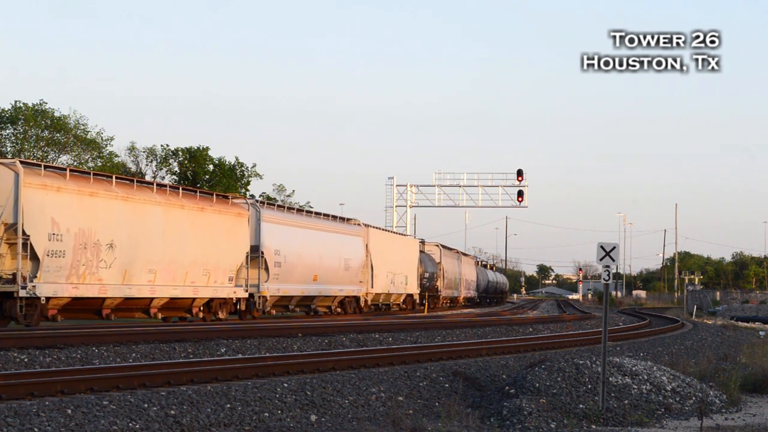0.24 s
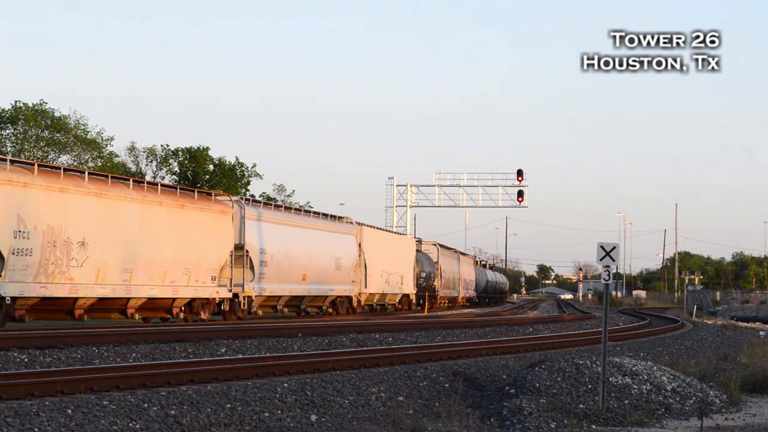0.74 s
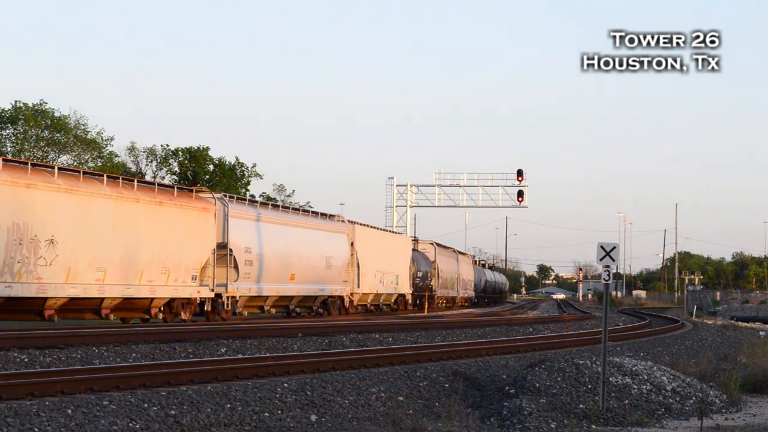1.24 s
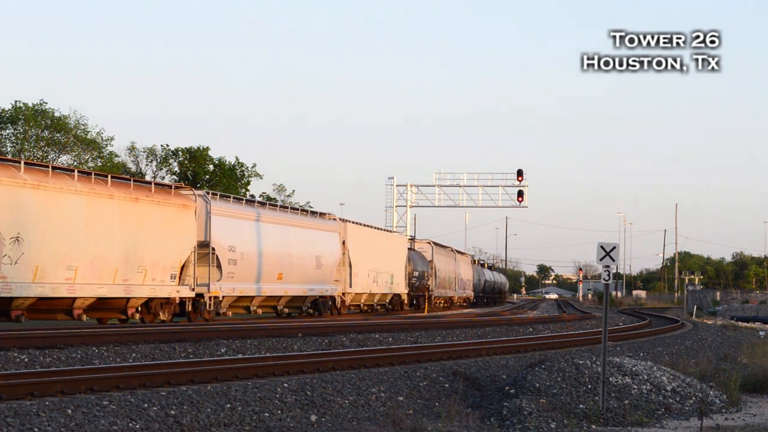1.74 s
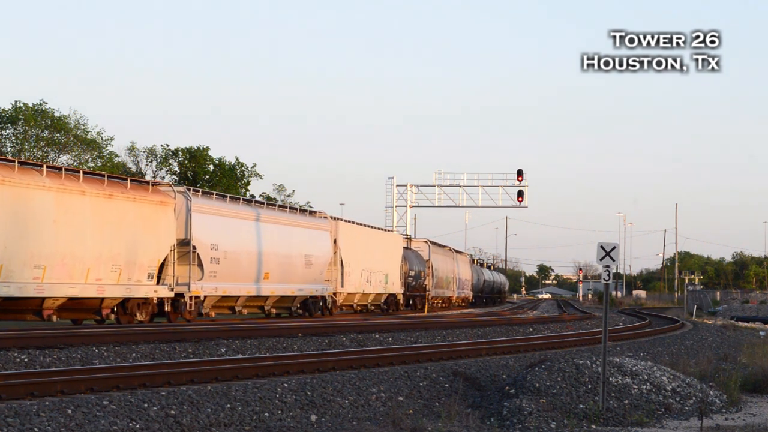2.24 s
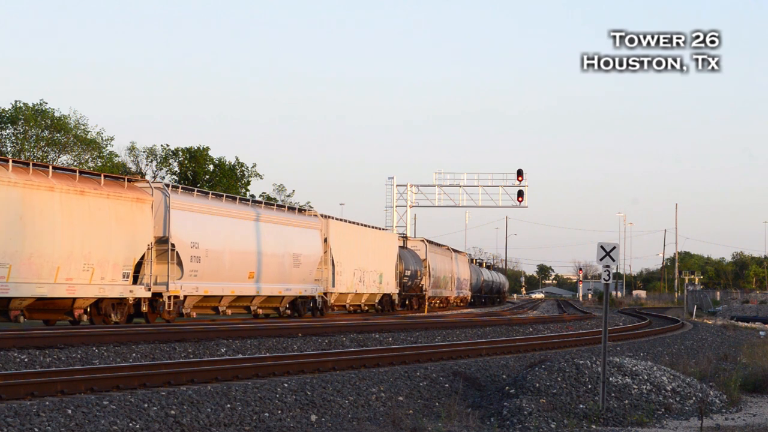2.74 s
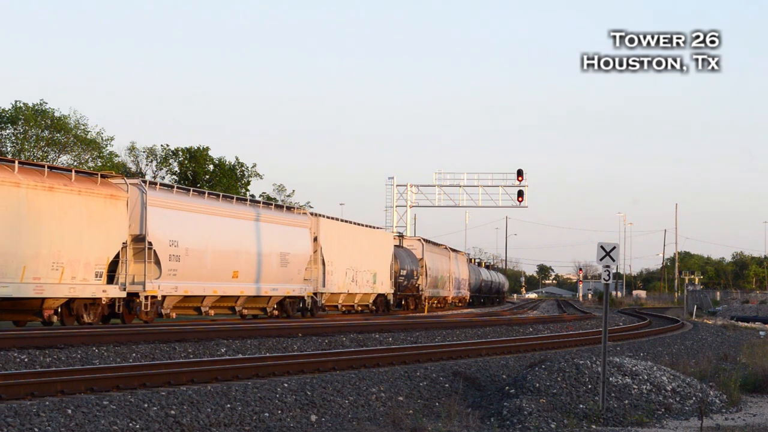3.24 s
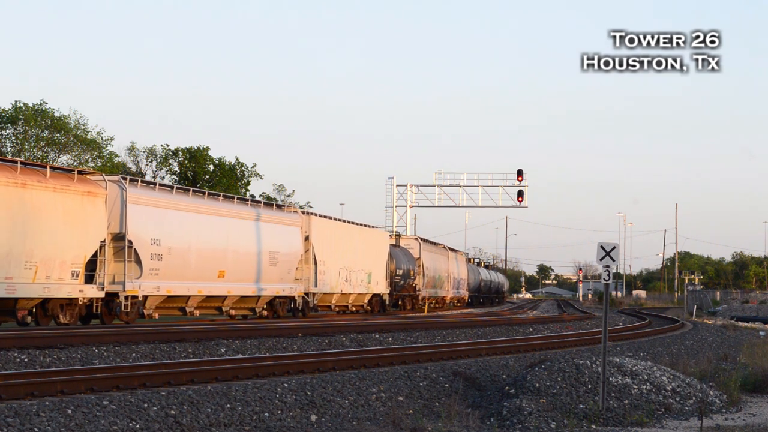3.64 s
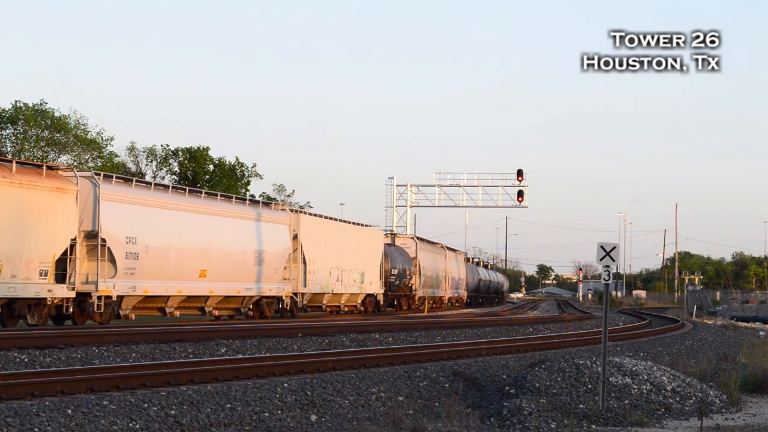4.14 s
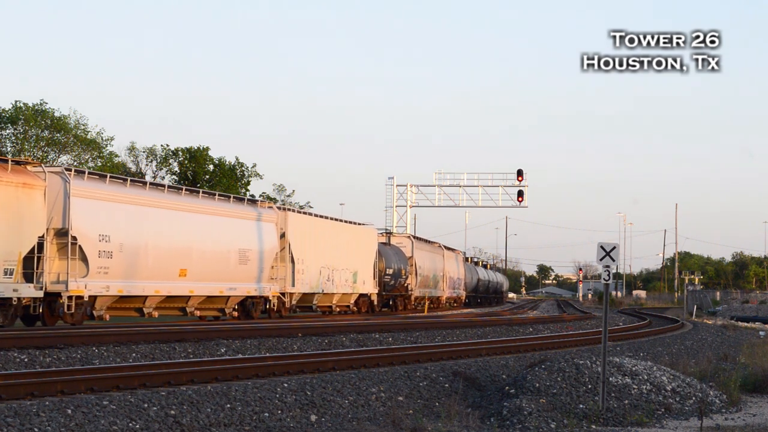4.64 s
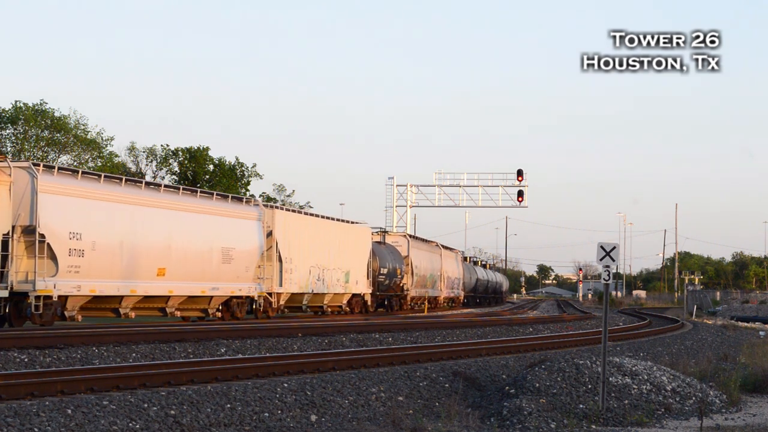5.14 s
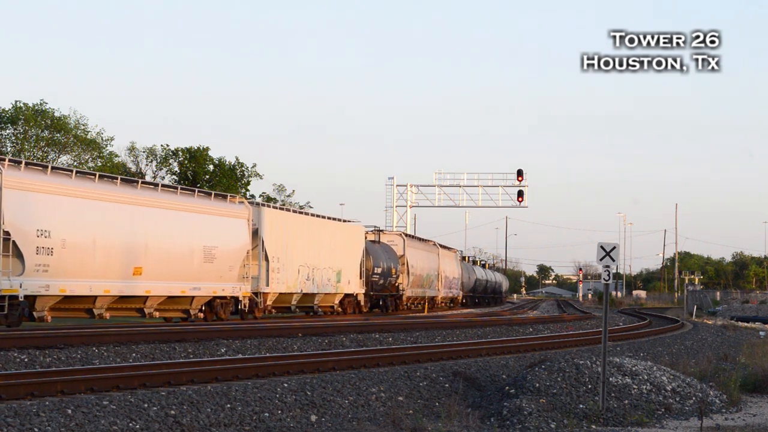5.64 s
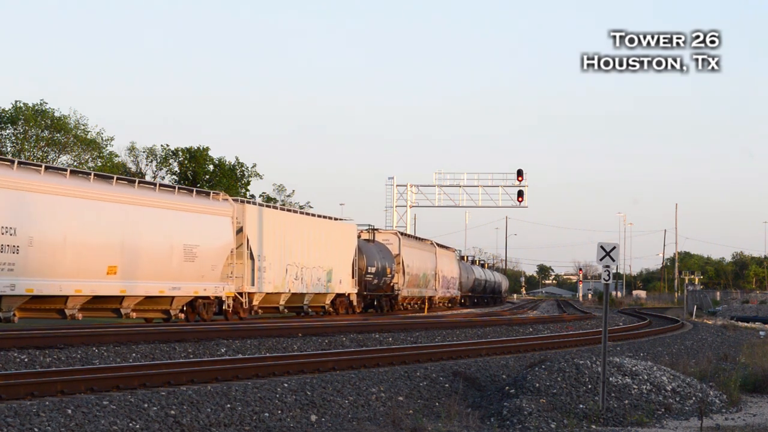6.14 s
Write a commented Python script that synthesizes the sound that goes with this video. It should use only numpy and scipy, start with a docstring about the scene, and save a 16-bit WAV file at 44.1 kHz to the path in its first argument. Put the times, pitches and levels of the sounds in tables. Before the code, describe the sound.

A high, wavering train wheel squeal turns into a hissing metallic screech as freight cars rumble slowly past on curved track.

```python
"""Freight cars on a tight curve

The cars roll slowly past one mono microphone. Flanges grind on the rail in bouts; the friction hisses
and rings the steel wheels in their modes. Single modes lock into squeals for a while, one wheel sings
two notes throughout and the rims whistle thinly. Below, the cars rumble and their bodies groan."""
import sys
import numpy as np
from scipy import signal
from scipy.fft import rfft, irfft
from scipy.io import wavfile
from scipy.ndimage import uniform_filter1d

SR = 44100
rng = np.random.default_rng(int(sys.argv[2]) if len(sys.argv) > 2 else 0)


def generate_wav(sig):
    """Save sig (samples, or channels by samples) to the path in sys.argv[1] as 16-bit PCM at SR."""
    pcm = np.round(np.clip(np.atleast_2d(sig).T, -1, 1) * 32767).astype(np.int16)
    wavfile.write(sys.argv[1], SR, pcm)


N = 281799
FREQ_HZ = np.arange(N // 2 + 1) * SR / N
TIME_S = np.arange(N) / SR

# rolling noise spectrum: f/Hz, relative density/dB
RUMBLE_SPECTRUM = [(15, -47), (28, -22), (55, -6), (90, 0), (125, -9.5), (200, -11), (270, -20.5),
                   (934, -20.5), (1460, -26), (2400, -23.5), (4080, -42), (7540, -34), (11000, -40),
                   (15600, -47)]
# rolling noise above the bass: t/s, level/dB
RUMBLE_UPPER_LEVEL = [(0, -45), (1.5, -43), (5.4, -42.5), (5.8, -41.5), (6.39, -42.5)]
# singing wheel: t/s, high note level/dB, low note level/dB
SINGING_LEVELS = [(0.0, -27, -40), (0.23, -27, -37.5), (0.27, -33, -44), (0.39, -23.5, -38),
                  (0.5, -29, -46), (0.53, -23, -41.5), (0.75, -28.5, -37), (1.01, -26, -53),
                  (1.07, -23.5, -40), (1.42, -30, -39), (1.51, -20, -49), (1.56, -34, -48),
                  (1.96, -23.5, -42), (2.08, -26, -43), (2.37, -22.5, -55), (2.72, -34, -46),
                  (3.75, -41, -53), (4.0, -31.5, -47), (4.16, -39, -50.5), (5.92, -37, -48),
                  (6.34, -33, -55), (6.39, -38, -52)]
# its grip: t/s, pitch/rest pitch, locked tone weight/dB
SINGING_GRIP = [(0, 1.0015, 0), (1.2, 1, 0), (2.5, .9982, 3), (2.75, 1.002, -9), (6.39, 1.0005, -8)]
# modes of a released wheel: f/Hz, level/dB, t60/s
RELEASED_MODES = [(960, -60, 3), (3547, -52, 2), (5476, -52, .9), (6454, -42, .7), (7425, -42, 1.2),
                  (8420, -50, .8), (8660, -58, .6), (9070, -62, 5), (10330, -64, 1.2)]
# rim friction: t/s, level/dB
RIM_FRICTION = [(0, -72), (.26, -82), (.49, -76), (.68, -58), (1.14, -61), (1.39, -47), (1.92, -45),
                (2.7, -43.5), (3.17, -48.5), (3.46, -40), (3.69, -60), (3.9, -44), (4.32, -52.5),
                (5.33, -59.5), (6.39, -50)]
# modes of rims, near wheels, far wheels: f/Hz, nominal width/Hz, relative density/dB
RIM_MODES = [(10954, 45, 4), (11127, 80, 8), (11380, 77, 10), (11620, 82, 7), (11857, 18, -6),
             (12020, 49, 7), (12154, 52, 2), (12302, 50, 4), (12433, 55, 0), (12776, 104, 0),
             (13290, 22, 0), (13367, 128, -7), (13723, 30, -9), (13851, 76, -3), (14135, 66, -14),
             (14434, 98, -7), (15145, 79, -10)]
NEAR_MODES = [(1644, 65, -4), (1785, 29, 1), (1954, 107, 3), (2252, 46, 3), (2645, 37, 8), (2839, 149, 8),
              (3355, 74, 2), (3584, 58, 6), (3946, 128, 7), (4944, 149, 2), (5154, 57, 4), (5265, 33, 9),
              (5528, 87, 11), (5870, 149, 3), (6036, 58, 7), (6440, 38, 14), (6518, 50, 13), (6702, 34, 5),
              (6864, 82, 5), (7125, 33, -4), (7474, 92, 9), (7754, 118, 2), (8360, 44, 3), (8481, 56, 8),
              (8714, 31, 1), (9466, 87, 1), (9709, 38, -4), (10457, 100, -6), (10551, 18, -10),
              (10751, 36, -13)]
FAR_MODES = [(1611, 106, -6), (1775, 35, 1), (1955, 149, 1), (2229, 38, 3), (2641, 30, 8), (2755, 149, 6),
             (3319, 149, -1), (3578, 38, 10), (3848, 52, 1), (4019, 149, 3), (5128, 149, 4), (5257, 29, 5),
             (5508, 70, 12), (5856, 149, 2), (6022, 34, 5), (6478, 77, 11), (6691, 62, 5), (6861, 149, 2),
             (7443, 78, 4), (7561, 57, 2), (7770, 149, -2), (8471, 149, 1), (9453, 123, -4),
             (9751, 149, -12), (10465, 149, -9)]
# friction noise off rail and wheel web: f/Hz, relative density/dB
HISS_SPECTRUM = [(500, -33.5), (900, -12.5), (1430, -15.5), (1800, -10), (2700, -2), (3600, -4), (4400, 0),
                 (5500, -1.5), (7000, -5), (8900, -12.5), (10500, -17.5), (12500, -24.5), (15600, -38)]
# flange friction further along the curve: t/s, level/dB, treble over middle/dB
FAR_FRICTION = [(0, -48.5, -6), (.34, -56, -5), (.54, -57.5, -12), (.62, -38, -1), (1.15, -32, 1),
                (1.24, -35.5, -8), (3.05, -35.5, -5), (3.24, -35, -1), (3.4, -32.5, -1), (3.58, -33.5, 2.5),
                (3.76, -36.5, 8), (3.92, -31.5, 0.5), (4.2, -33.5, 1.5), (4.34, -29.5, -0.5),
                (4.49, -33, 0), (4.72, -28, -1), (4.82, -29.5, -0.5), (5.55, -31.5, -2), (5.76, -29, -1.5),
                (5.9, -32, -0.5), (6.18, -29.5, -2), (6.3, -31.5, 1), (6.39, -26, 2.2)]
# flange bouts close by: t/s, length/s, level/dB, treble over middle/dB
NEAR_BOUTS = [(0.543, 0.29, -26.5, 0.5), (1.251, 0.31, -25, 3.5), (1.6, 0.44, -32, 9),
              (1.974, 0.2, -24, 0.5), (2.223, 0.67, -25.5, -1)]
# car body groans, locked wheel modes: t/s, length/s, f/Hz, level/dB
BODY_GROANS = [(0.1, 0.54, 182.6, -55.5), (0.95, 0.45, 179.3, -53), (3.76, 0.17, 151, -42),
               (4.0, 0.34, 186, -53), (4.7, 0.21, 156.3, -50), (5.1, 0.49, 213, -55.5),
               (5.6, 0.43, 399, -59), (5.8, 0.59, 219.6, -52.5), (5.8, .5, 339, -61.5)]
WHEEL_SQUEALS = [(.6, .4, 7465, -38), (.61, .95, 2897, -44), (.64, 1.33, 7378, -39), (.66, .24, 6531, -39),
                 (.66, .63, 6398, -35), (.67, .22, 9450, -46), (.68, .37, 967, -45), (.72, .52, 5170, -48),
                 (.69, 1.21, 1944, -46), (.75, .54, 8344, -40), (.76, .64, 5430, -43),
                 (1.05, 1.1, 963, -48.5), (1.26, .4, 9446, -47), (1.27, .5, 2250, -48),
                 (1.27, .65, 5269, -42), (1.29, 1.07, 9701, -53), (1.28, .19, 3952, -41),
                 (1.29, 1.38, 8478, -38), (1.3, .18, 5553, -37), (1.3, .18, 6511, -35),
                 (1.3, .31, 7511, -39), (1.3, .62, 7763, -43), (1.31, .14, 6038, -39),
                 (1.31, .98, 6873, -40), (1.37, .53, 8709, -45), (1.44, .31, 8338, -40),
                 (1.59, .31, 6401, -40), (1.69, .44, 11140, -49), (1.73, .69, 11387, -51),
                 (1.74, 1.1, 9466, -43), (1.87, .99, 6046, -41), (1.98, .17, 7760, -34),
                 (2.07, .82, 7495, -40), (2.18, .8, 962, -45), (2.2, .7, 2015, -44), (2.2, .8, 1005, -48),
                 (2.24, .14, 6545, -38), (2.25, .56, 3020, -36), (2.31, .24, 7363, -41),
                 (2.31, .45, 4011, -41), (2.38, .14, 6401, -38), (2.39, 1.21, 7566, -45),
                 (2.45, .7, 1058, -50), (2.47, .52, 5898, -41), (2.5, .31, 5145, -40),
                 (2.63, .17, 6454, -36), (2.71, .82, 8516, -46), (2.97, 1.09, 6445, -41),
                 (3.02, .51, 9439, -56), (3.05, .55, 1050, -55), (3.1, .3, 5477, -35),
                 (3.31, .67, 11060, -52), (3.93, .38, 12088, -52), (4.65, .41, 5521, -39),
                 (5.05, 1.3, 3575, -47), (5.1, .5, 6450, -41), (5.34, .15, 5513, -40),
                 (5.78, .6, 6832, -43), (5.9, .45, 6005, -46), (6.02, .35, 8708, -47),
                 (6.18, .19, 5236, -42), (6.08, .3, 6496, -38), (5.7, .4, 7744, -46), (6.08, .3, 7732, -41)]


def from_db(db):
    """Decibels to gain."""
    return 10 ** (np.asarray(db) / 20)


def unit_rms(x):
    """Scale to rms 1."""
    return x / np.sqrt(np.mean(np.abs(x) ** 2) + 1e-20)


def curves(table):
    """Columns of a time table, per sample."""
    t_s, *columns = np.transpose(table)
    return [np.interp(TIME_S, t_s, column) for column in columns]


def coloured(gain):
    """Noise shaped by a gain per frequency; rms 1."""
    return unit_rms(irfft(gain * rfft(rng.standard_normal(N)), N))


def spectrum(points):
    """Gain per frequency from f/Hz, level/dB points."""
    hz, db = np.transpose(points)
    return from_db(np.interp(np.log(FREQ_HZ + 1), np.log(hz), db))


def peak(hz, width_hz):
    """A resonance passed twice; gain 1 on top."""
    return 1 / (1 + ((FREQ_HZ - hz) / width_hz) ** 2)


def drift(rate_hz):
    """Slow random curve; rms 1."""
    return coloured(peak(0, rate_hz))


def split(x, crossover_hz, order):
    """Low and high band of x."""
    low = irfft(rfft(x) / (1 + (FREQ_HZ / crossover_hz) ** order), N)
    return low, x - low


def wavering(hz, width_hz, steady_share, count):
    """Tone of wandering amplitude and phase, held up by a steady share; rms 1."""
    pole = np.exp(-2 * np.pi * width_hz / SR)
    settle = 2000
    white = rng.standard_normal(count + settle) + 1j * rng.standard_normal(count + settle)
    wander = unit_rms(signal.lfilter([1], [1, -2 * pole, pole ** 2], white)[settle:])
    amplitude = np.sqrt(steady_share) + np.sqrt(1 - steady_share) * wander
    phase_rad = 2 * np.pi * np.cumsum(hz * np.ones(count)) / SR
    return unit_rms(np.real(amplitude * np.exp(1j * phase_rad)))


def notes(table, width_hz, steady_share, edge_s):
    """Wavering tones that swell in, hold and fade."""
    out = np.zeros(N)
    for onset_s, length_s, hz, db in table:
        start = max(round((onset_s - edge_s) * SR), 0)
        end_s = onset_s + length_s + 2 * edge_s
        t_s = TIME_S[start:round(end_s * SR)]
        rise = (t_s - onset_s + edge_s) / (2 * edge_s)
        fall = (end_s - t_s) / (3 * edge_s)
        envelope = np.sin(np.pi / 2 * np.clip(np.minimum(rise, fall), 0, 1)) ** 2
        tone = wavering(hz, width_hz, steady_share, len(t_s))
        out[start:start + len(t_s)] += from_db(db) * envelope * tone
    return out


def mode_gain(modes, sharpness=1.2):
    """Response of a set of modes to friction noise, summed in power."""
    return np.sqrt(sum((from_db(db) * peak(hz, width_hz / sharpness)) ** 2 for hz, width_hz, db in modes))


def several_wheels(gain, grain_db, grain_hz=25.14, swell_db=4, wheels=4):
    """Each wheel has its own narrow lines within the modes and its own swell; total power holds."""
    out, power = 0, 0
    lines_hz = np.arange(0, SR / 2 + grain_hz, grain_hz)
    for _ in range(wheels):
        lines_db = grain_db * np.interp(FREQ_HZ, lines_hz, rng.standard_normal(len(lines_hz)))
        swell = from_db(swell_db * drift(rate_hz=2.16))
        out += swell * coloured(gain * from_db(lines_db))
        power += swell ** 2
    return out / np.sqrt(power)


def rolling(bass_db=-42, lumps_db=1.2):
    """Wheels, rail and car bodies rumble; the bass comes in lumps."""
    upper_db, = curves(RUMBLE_UPPER_LEVEL)
    bass, upper = split(coloured(spectrum(RUMBLE_SPECTRUM)), crossover_hz=250, order=4)
    return from_db(bass_db + lumps_db * drift(rate_hz=5.7)) * bass + from_db(upper_db) * upper


def singing_mode(hz, width_hz, skirt_width_hz, skirt_db):
    """A locked tone beats quickly with a noise skirt just below; the drive evens out slower swings."""
    bend, lock_db = curves(SINGING_GRIP)
    tone = wavering(hz * bend, width_hz, steady_share=0.72, count=N)
    skirt = coloured(peak(hz - 21, skirt_width_hz) ** 2.7)
    note = from_db(lock_db) * tone + from_db(skirt_db) * skirt
    power = uniform_filter1d(uniform_filter1d(note ** 2, size=SR // 16), size=SR // 16)
    return note / np.sqrt(power)


def singing_wheel():
    """Two modes of one wheel sing throughout."""
    high_db, low_db = curves(SINGING_LEVELS)
    high = singing_mode(hz=4540, width_hz=20, skirt_width_hz=92.4, skirt_db=-4.5)
    low = singing_mode(hz=2616, width_hz=7.88, skirt_width_hz=36.4, skirt_db=-13.5)
    return from_db(high_db) * high + from_db(low_db) * low


def released_wheel(fade_s=0.25):
    """A wheel just let go rings out over the first second."""
    t_s = TIME_S[:SR]
    ring = sum(from_db(db - 60 * t_s / t60_s) * wavering(hz, width_hz=5.8, steady_share=0.46, count=SR)
               for hz, db, t60_s in RELEASED_MODES)
    return np.pad(ring * np.clip((1 - t_s) / fade_s, 0, 1), (0, N - SR))


def rim_whistle(locks_per_mode=3, mean_lock_s=0.79, lock_offset_db=-17):
    """Friction rings thin, high rim modes; at random times one locks into a faint squeal."""
    friction_db, = curves(RIM_FRICTION)
    locks = []
    for hz, _, mode_db in RIM_MODES:
        for _ in range(locks_per_mode):
            onset_s = rng.uniform(0, N / SR)
            length_s = mean_lock_s * rng.uniform(0.5, 1.5)
            level_db = friction_db[int(onset_s * SR)] + mode_db + lock_offset_db
            locks.append((onset_s, length_s, hz, level_db))
    return from_db(friction_db) * several_wheels(mode_gain(RIM_MODES), grain_db=9) + squeals(locks)


def grinding(modes, middle_gain, treble_gain, hiss_db=2.5):
    """Flange friction drives a broad hiss and the wheel modes."""
    gain = np.hypot(from_db(hiss_db) * spectrum(HISS_SPECTRUM), mode_gain(modes))
    middle, treble = split(several_wheels(gain, grain_db=5), crossover_hz=4500, order=6)
    return middle_gain * middle + treble_gain * treble


def far_flanges():
    """Flanges further along the curve grind without a break."""
    friction_db, lift_db = curves(FAR_FRICTION)
    return grinding(FAR_MODES, from_db(friction_db - lift_db / 2), from_db(friction_db + lift_db / 2))


def groans():
    """Car bodies groan in low, unsteady tones."""
    return notes(BODY_GROANS, width_hz=5.9, steady_share=0.21, edge_s=0.042)


def near_flanges(bite_s=0.045, sag_db_per_s=2.5, release_db_per_s=66):
    """Flanges close by grind in bouts: each bites, sags while it holds and lets go."""
    middle_power, treble_power = 0, 0
    for onset_s, length_s, db, lift_db in NEAR_BOUTS:
        age_s = np.maximum(TIME_S - onset_s, 0)
        sag_db = sag_db_per_s * np.minimum(age_s, length_s)
        release_db = release_db_per_s * np.maximum(age_s - length_s, 0)
        gain = np.clip(age_s / bite_s, 0, 1) ** 2 * from_db(db - sag_db - release_db)
        middle_power += (gain * from_db(-lift_db / 2)) ** 2
        treble_power += (gain * from_db(lift_db / 2)) ** 2
    return grinding(NEAR_MODES, np.sqrt(middle_power), np.sqrt(treble_power))


def squeals(locks):
    """Single modes lock into narrow tones for a while."""
    return notes(locks, width_hz=12.8, steady_share=0.41, edge_s=0.04)


def scene(stutter_db=0.6):
    """All sources at one microphone; the flanges' grip stutters a little."""
    mono = rolling() + singing_wheel() + released_wheel() + rim_whistle()
    mono += from_db(stutter_db * drift(rate_hz=12)) * (far_flanges() + near_flanges())
    mono += groans() + squeals(WHEEL_SQUEALS)
    return np.array([mono, mono])


def record(dry, cutoff_hz=15700):
    """Steep low-pass."""
    return signal.sosfilt(signal.ellip(10, .5, 60, cutoff_hz, fs=SR, output="sos"), dry)


dry = scene()
out = record(dry)
generate_wav(out)
```